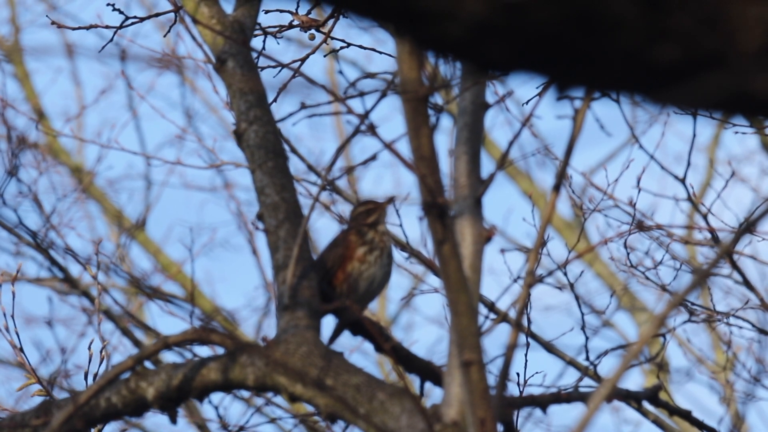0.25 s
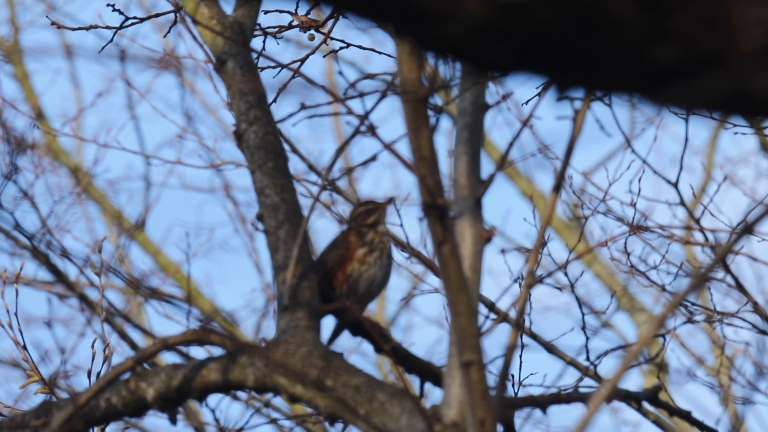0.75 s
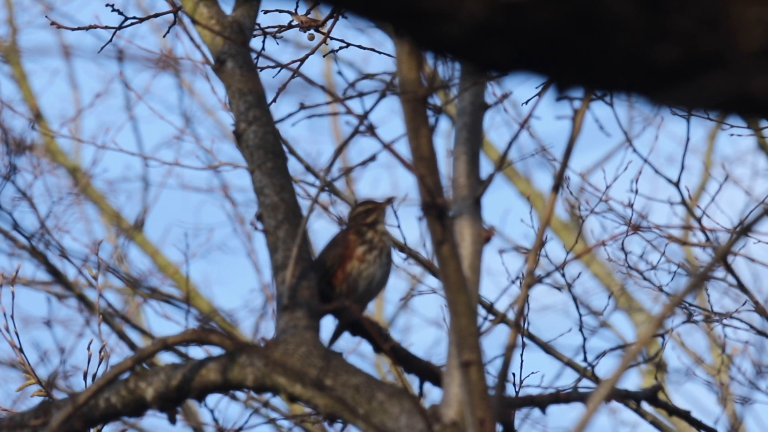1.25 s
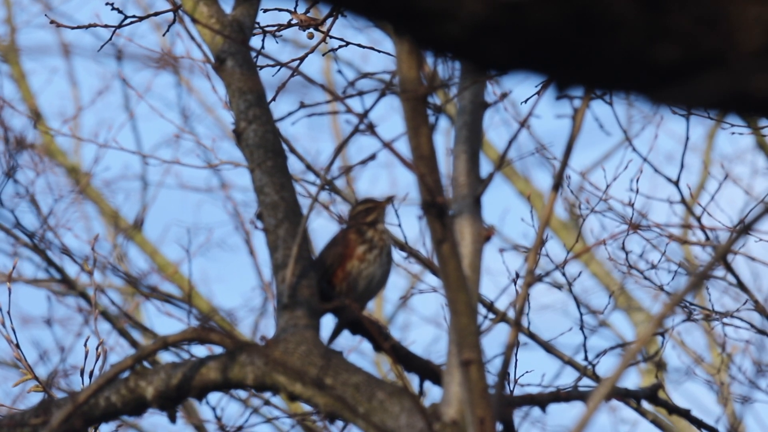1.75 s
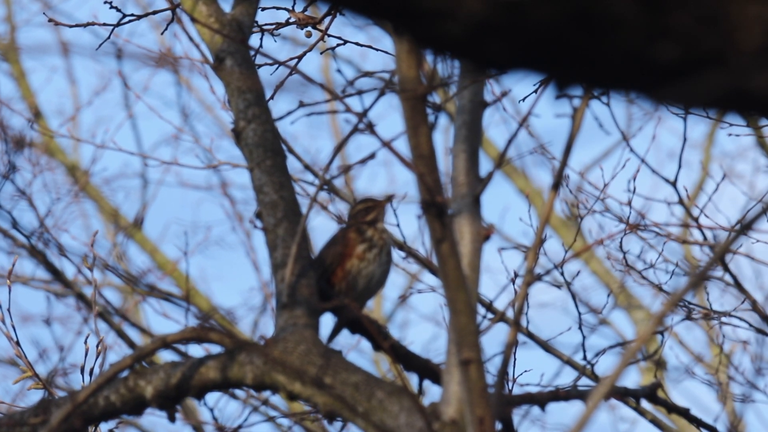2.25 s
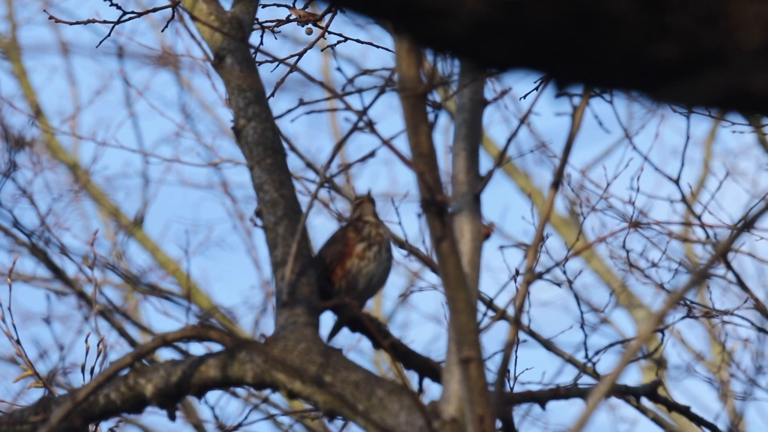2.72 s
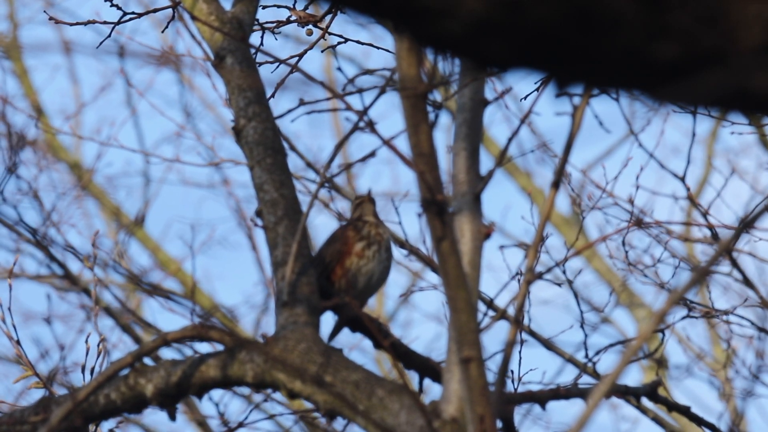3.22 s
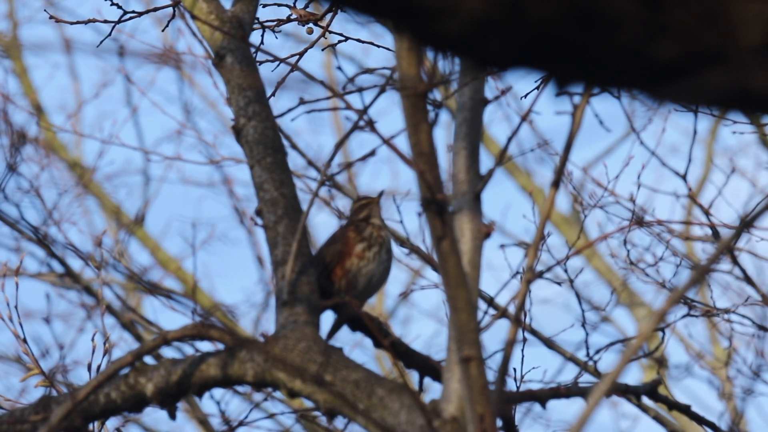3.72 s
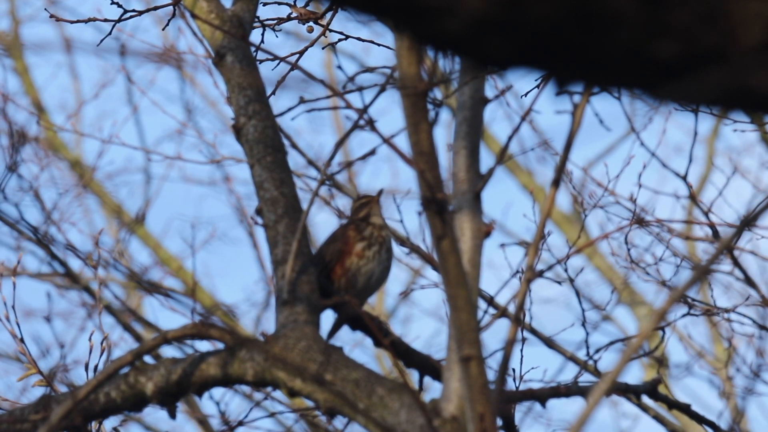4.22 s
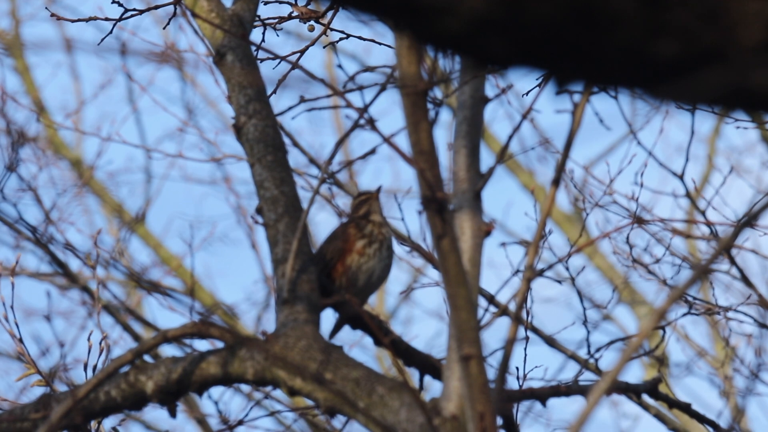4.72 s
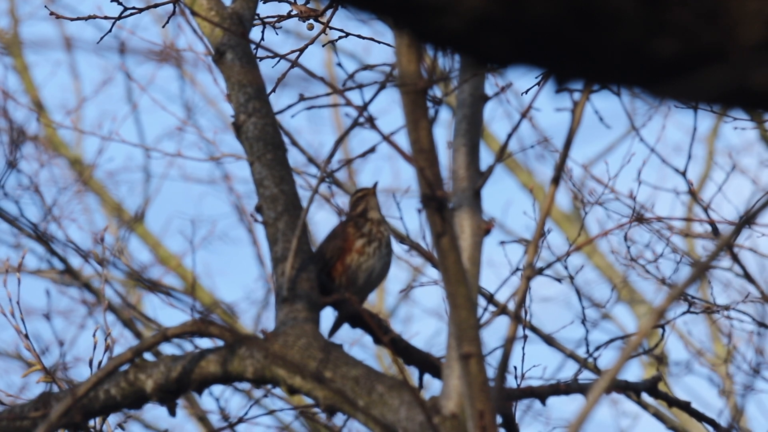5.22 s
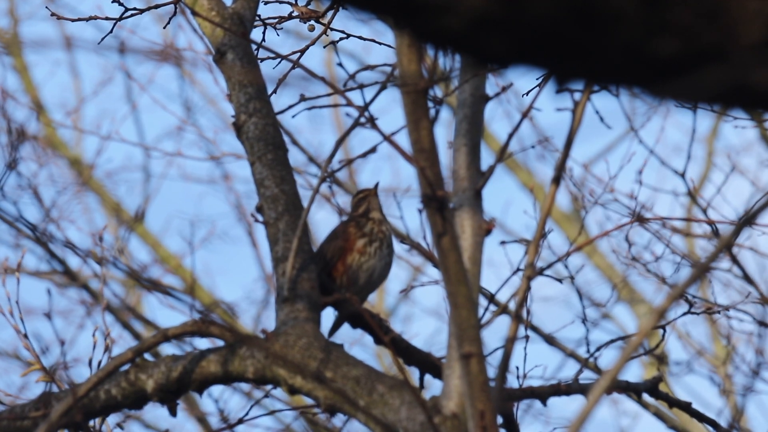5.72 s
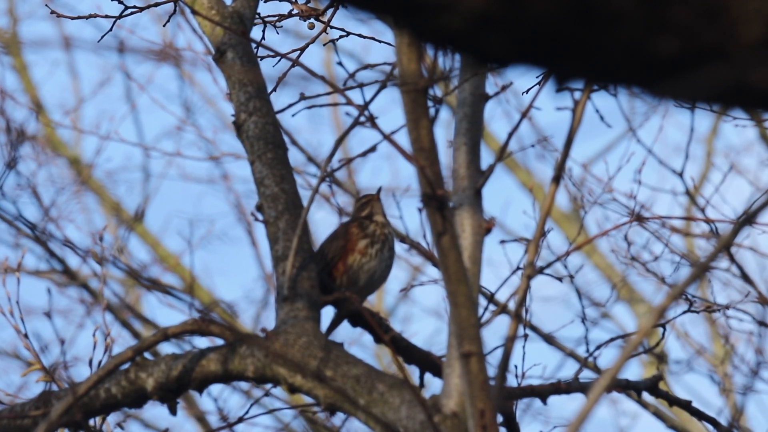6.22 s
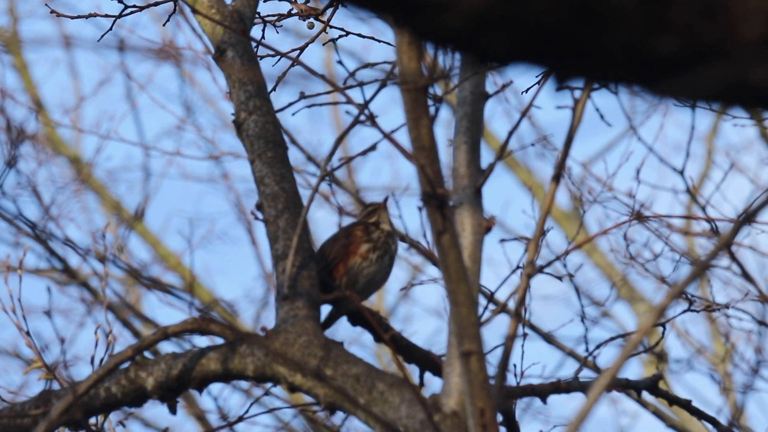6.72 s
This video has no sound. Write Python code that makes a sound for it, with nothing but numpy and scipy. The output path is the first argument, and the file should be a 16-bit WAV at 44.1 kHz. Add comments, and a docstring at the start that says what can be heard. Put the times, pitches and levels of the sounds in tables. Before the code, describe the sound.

Small thrushes twitter and whistle in park trees, one warbling louder nearby, over distant traffic and a brief rumble of wind on the microphone.

```python
"""A park, under bare trees. Small thrushes twitter all around in gliding whistles; the nearest sings a
loud warbled phrase, and trunks and branches scatter the song. Twigs rustle and tick, far traffic hums
underneath. For two seconds the sound turns wide and gusts of wind rumble on the microphone;
before and after, it is the same in both ears."""
import sys
import numpy as np
from scipy import signal
from scipy.io import wavfile
from scipy.ndimage import uniform_filter1d

SR = 44100
rng = np.random.default_rng(int(sys.argv[2]) if len(sys.argv) > 2 else 0)


def materialize(psi):
    """Save the field psi as 16-bit PCM at rate SR to the path in sys.argv[1].

    A 1-D psi becomes a single channel; in a 2-D psi each row is a channel.
    """
    bounded = np.clip(np.atleast_2d(psi).T, -1, 1)
    quanta = np.round(bounded * 32767).astype(np.int16)
    wavfile.write(sys.argv[1], SR, quanta)


N = 306936
TIME_S = np.arange(N) / SR


# Three warbles from the nearest bird, then a fainter, higher one; one curve each.
# time_s, swings_per_s, dip_hz, top_hz, level_db
WARBLE_CURVES = [
    [(1.487, 69, 2380, 3050, -33), (1.52, 30, 2400, 3340, -32.5), (1.565, 44, 2390, 3540, -34),
     (1.59, 98, 2900, 3300, -34)],
    [(1.74, 44, 2800, 3320, -22.5), (1.787, 48, 2465, 3394, -27), (1.814, 114, 2820, 3636, -23.5),
     (1.823, 106, 3280, 3940, -31.5), (1.843, 120, 3600, 4110, -21), (1.866, 117, 3260, 3845, -24.5),
     (1.882, 97, 3480, 3940, -27)],
    [(1.963, 110, 3570, 4070, -30), (1.984, 102, 3740, 3940, -34), (2.0, 66, 3370, 4150, -35),
     (2.05, 42, 3430, 4580, -29.5), (2.066, 92, 3570, 4360, -34), (2.087, 70, 3650, 4630, -29),
     (2.098, 79, 4500, 4870, -40)],
    [(2.408, 29, 5000, 6400, -47), (2.45, 43, 4760, 5830, -41.5), (2.5, 48, 4900, 5850, -46)],
]

def warble(curve):
    """The pitch swings from dip to top and falls back faster; tops are louder, no two reach alike."""
    times, *controls = np.transpose(curve)
    t = np.arange(times[0], times[-1], 1 / SR)
    swings_per_s, dip_hz, top_hz, db = (np.interp(t, times, c) for c in controls)
    cycle = np.cumsum(swings_per_s) / SR % 1
    lift = .5 - .5 * np.cos(2 * np.pi * cycle ** 1.2)
    reach = 1 + .17 * unit_rms(uniform_filter1d(rng.standard_normal(len(t)), size=500))
    hz = dip_hz + (top_hz - dip_hz) * (.5 + reach * (lift - .5))
    level = gain(db + 6.5 * (lift - 1.5)) * signal.windows.tukey(len(t), .07)
    return whistle(hz, level, rough=.13, overtone_db=-22)


# Single notes from the trees around the microphone.
# start_s, length_s, first_hz, middle_hz, last_hz, level_db
THRUSH_NOTES = [(0.13, 0.1, 4110, 5370, 4650, -54), (0.17, 0.046, 1960, 1990, 2040, -49.5),
                (0.263, 0.027, 5700, 5550, 5230, -52), (0.269, 0.14, 3000, 2640, 2330, -52.5),
                (0.394, 0.065, 4080, 4245, 4260, -45.5), (0.435, 0.19, 4250, 4240, 4200, -58),
                (0.881, 0.077, 7540, 7120, 6580, -50.5), (0.909, 0.21, 7080, 7020, 6500, -53),
                (1.086, 0.042, 2180, 2200, 1960, -44.5), (1.078, 0.054, 3410, 3480, 3550, -48),
                (1.157, 0.038, 2410, 2355, 2560, -45), (1.186, 0.023, 2500, 3460, 2900, -44.5),
                (1.211, 0.036, 3120, 3280, 3140, -47.5), (1.215, 0.058, 6160, 6280, 6300, -52.5),
                (1.258, 0.048, 3110, 3105, 3420, -39), (1.384, 0.052, 7300, 7510, 7300, -48),
                (1.385, 0.11, 3160, 2540, 2220, -40), (1.424, 0.1, 7160, 7010, 7330, -51.5),
                (1.569, 0.16, 7540, 7040, 6430, -51.5), (1.587, 0.054, 2960, 3175, 3570, -30),
                (1.603, 0.059, 6190, 6800, 7040, -53), (1.69, 0.048, 2930, 3350, 3520, -31),
                (1.75, 0.065, 4410, 4395, 4380, -39.5), (1.915, 0.045, 2500, 2620, 2950, -49),
                (2.084, 0.063, 4850, 5540, 5460, -40), (2.097, 0.049, 4700, 5050, 4930, -40),
                (2.223, 0.021, 7160, 5170, 4200, -44), (2.226, 0.05, 2980, 2900, 3020, -46),
                (2.232, 0.065, 2464, 2235, 2450, -47), (2.31, 0.058, 2400, 2550, 2950, -45),
                (2.406, 0.023, 5500, 7500, 7900, -49), (2.408, 0.048, 4080, 4020, 4460, -50),
                (2.424, 0.024, 6950, 6970, 7000, -42.5), (2.439, 0.029, 7470, 7560, 8330, -45),
                (2.465, 0.04, 8200, 8200, 8200, -47), (2.52, 0.048, 2300, 2910, 3180, -51),
                (2.545, 0.029, 3950, 4200, 4230, -47), (2.597, 0.019, 2300, 2890, 2300, -45),
                (2.618, 0.025, 3500, 2820, 2200, -42), (2.688, 0.035, 2450, 2380, 2270, -49),
                (2.657, 0.03, 3830, 4060, 4030, -45.5), (2.712, 0.031, 3500, 2730, 2100, -47),
                (2.725, 0.016, 5800, 4580, 3600, -46), (2.731, 0.036, 3540, 3620, 3830, -46),
                (2.785, 0.019, 3850, 4000, 4000, -44), (2.803, 0.019, 5900, 3980, 3500, -40),
                (2.83, 0.055, 6800, 5770, 5560, -53), (2.843, 0.045, 7220, 7200, 7000, -50),
                (2.853, 0.03, 3290, 3400, 3480, -48), (3.093, 0.083, 3330, 3444, 3540, -42),
                (3.109, 0.12, 6510, 6030, 5600, -48), (3.06, 0.28, 7300, 7550, 7500, -56),
                (3.19, 0.022, 4100, 3150, 2760, -39), (3.28, 0.053, 3140, 3110, 3980, -45),
                (3.316, 0.07, 3050, 3040, 2760, -40), (3.474, 0.034, 1220, 2290, 2970, -44),
                (3.559, 0.038, 5280, 6200, 6460, -52), (3.584, 0.085, 6770, 6580, 6720, -48),
                (3.722, 0.15, 3980, 4036, 4080, -49), (3.833, 0.073, 2660, 2225, 2230, -45.5),
                (3.9, 0.14, 7440, 7200, 7000, -58), (4.133, 0.046, 2000, 2070, 2070, -45.5),
                (4.181, 0.25, 5450, 5400, 4800, -58), (4.191, 0.13, 3490, 3470, 3720, -52),
                (4.249, 0.15, 7140, 6520, 6630, -48.5), (4.259, 0.02, 7720, 7760, 7590, -48),
                (4.316, 0.068, 3070, 2970, 2740, -47.5), (4.575, 0.13, 7080, 7280, 7170, -51.5),
                (4.685, 0.064, 2680, 3020, 2730, -46), (4.734, 0.054, 4410, 4460, 4400, -44),
                (4.775, 0.14, 4470, 4410, 4480, -57), (4.788, 0.02, 7000, 8450, 7400, -54),
                (4.81, 0.035, 2800, 2260, 1770, -55), (4.938, 0.018, 7300, 8270, 8400, -51),
                (5.03, 0.022, 6500, 8260, 7400, -51), (5.05, 0.033, 3300, 3200, 2320, -49),
                (5.155, 0.13, 8100, 8300, 7200, -67), (5.158, 0.06, 2200, 2340, 2620, -53.5),
                (5.13, 0.14, 5300, 5780, 5800, -57.5), (5.14, 0.125, 3950, 4200, 4000, -56),
                (5.275, 0.032, 4500, 7800, 4900, -59), (5.287, 0.1, 2950, 2970, 2990, -50),
                (5.383, 0.028, 6540, 3900, 3100, -55), (5.403, 0.032, 3320, 2920, 3040, -44),
                (5.425, 0.12, 3620, 3450, 3170, -50), (5.541, 0.034, 2170, 3200, 4500, -47),
                (5.542, 0.018, 3300, 5200, 7200, -54), (5.565, 0.18, 7250, 6860, 6720, -55.5),
                (5.642, 0.19, 7300, 8640, 8700, -63), (5.629, 0.083, 3700, 3800, 4200, -51.5),
                (5.704, 0.14, 4290, 4350, 4260, -52), (5.814, 0.084, 7950, 7340, 7400, -53.5),
                (5.82, 0.052, 2850, 3180, 3680, -49), (5.828, 0.027, 3040, 2470, 2350, -45),
                (5.877, 0.165, 3660, 3800, 3440, -53.5), (5.963, 0.092, 4300, 4150, 4030, -53.5),
                (6.109, 0.0099, 2400, 3670, 2500, -37), (6.075, 0.051, 6700, 7040, 8000, -53),
                (6.12, 0.12, 7800, 7050, 7000, -54), (6.13, 0.042, 2100, 2700, 3200, -47),
                (6.182, 0.032, 2700, 2100, 1900, -50), (6.222, 0.08, 2550, 2520, 2490, -54),
                (6.23, 0.053, 3650, 3850, 4080, -54), (6.485, 0.028, 4900, 5840, 4600, -56),
                (6.193, 0.11, 4650, 6200, 6250, -55), (6.34, 0.15, 6500, 7050, 7100, -55.5),
                (6.575, 0.14, 7630, 7730, 7750, -59), (6.7, 0.081, 3800, 4300, 5100, -57),
                (6.786, 0.16, 4920, 4440, 4630, -58.5), (6.81, 0.074, 6910, 6780, 7100, -51.5),
                (6.873, 0.056, 6840, 7120, 7800, -54), (6.912, 0.04, 3300, 2780, 3000, -49)]

def thrushes():
    """The notes and warbles that stand out; fainter, farther notes are more blurred."""
    song = np.zeros(N)
    for start_s, *glide, db in THRUSH_NOTES:
        add(song, start_s, note(*glide, db, rough=np.interp(db, [-52, -34], [.24, .1])))
    for curve in WARBLE_CURVES:
        add(song, curve[0][0], warble(curve))
    return song


def note(length_s, first_hz, middle_hz, last_hz, db, rough):
    """A whistle bending along a parabola through three pitches; each end fades over 11 ms."""
    u = np.linspace(-1, 1, round(length_s * SR))
    hz = middle_hz + (last_hz - first_hz) / 2 * u + ((first_hz + last_hz) / 2 - middle_hz) * u ** 2
    fade = np.sin(np.pi / 2 * np.clip((1 - abs(u)) * length_s / .022, 0, 1))
    return whistle(hz, gain(db) * fade, rough, overtone_db=-29)


def whistle(hz, level, rough, overtone_db):
    """A bird's voice: a sine and a faint octave, trembling in pitch and strength, coming in lumps."""
    lumps = uniform_filter1d(rng.standard_normal(len(hz)), size=400) * np.sqrt(400)
    wobble, flutter = uniform_filter1d(rng.standard_normal((len(hz), 2)), 90, axis=0).T * np.sqrt(90)
    phase = 2 * np.pi * np.cumsum(hz * (1 + .037 * rough * wobble)) / SR
    strength = level * gain(7.4 * rough * lumps) * (1 + rough * flutter)
    return np.sqrt(2) * strength * (np.sin(phase) + gain(overtone_db) * np.sin(2 * phase))


def tree_echoes(song, t60_s, wet_db):
    """Trunks and branches return sparse, dying echoes; farther trees add a faint long tail."""
    tail_db, tail_t60_s = -18, 1
    t = np.arange(SR // 2) / SR
    decay = gain(-60 * t / t60_s) + gain(tail_db - 60 * t / tail_t60_s)
    echoes = rng.standard_normal(len(t)) * (rng.random(len(t)) < .05) * decay * (t > .004)
    echoes /= np.linalg.norm(echoes)
    echoes[round(.058 * SR)] += .25  # one distinct echo
    return song + gain(wet_db) * signal.fftconvolve(song, echoes)[:N]


# Gusts right on the microphone: time_s, level_db
GUST_LEVELS = [(.85, -38.5), (1.0, -37.5), (1.2, -36.5), (1.5, -33), (1.95, -35.5), (2.3, -34), (2.89, -38)]
# Their rumble: frequency_hz, density_db
WIND_SPECTRUM = [(15, -45), (28, -22), (42, -3), (62, 4), (100, -7), (180, -10), (400, -21), (650, -33)]
# Single buffets: centre_s, peak_db, pitch_hz
WIND_BUFFETS = [(1.074, -25, 66), (1.445, -35, 92), (1.534, -16, 70.5), (1.589, -17, 95), (1.69, -25, 55),
                (1.8, -18, 67.7), (1.879, -23, 59.6), (1.92, -19.5, 61.4), (2.15, -20, 57),
                (2.171, -20, 123), (2.4, -22.5, 55), (2.547, -26, 55), (2.63, -27, 52),
                (2.861, -24.5, 66.5)]

def wind():
    """Rumble and buffets of two or three cycles, partly unrelated between the ears: mid and side."""
    level = gain(along(GUST_LEVELS, 1)) * wide_stretch()
    mid, side = (level * noise(WIND_SPECTRUM, patchy_db=1.5, size=4096) for _ in range(2))
    for centre_s, db, hz in WIND_BUFFETS:
        phase, lean = rng.random(2)
        cycles = hz * (TIME_S - centre_s)
        buffet = gain(db) * np.cos(2 * np.pi * (cycles + phase)) * np.exp(-(1.24 * cycles) ** 2)
        mid += buffet
        side += (lean - .5) * buffet
    return mid, gain(-7) * side


# Twigs ticking: centre_s, knock_db, pitch_hz, snap_db
TWIG_TICKS = [(1.668, -19.5, 1350, -38), (3.222, -28, 1220, -29.5), (3.243, -27, 1550, -29.5)]

def twig_ticks():
    """A cycle or two of knock with a sharp snap just in front."""
    out, t = np.zeros(N), np.arange(-100, 200) / SR
    for centre_s, knock_db, hz, snap_db in TWIG_TICKS:
        knock = gain(knock_db) * np.cos(2 * np.pi * hz * t) * np.exp(-(2.25 * hz * t) ** 2)
        hiss = uniform_filter1d(rng.standard_normal(len(t)), size=3)
        snap = gain(snap_db) * hiss * np.exp(-abs(t + .00033) / .0011)
        add(out, centre_s + t[0], knock + snap)
    return out


# The park's background, slowly drifting: time_s, traffic_db, low_chorus_db, high_chorus_db, rustle_db
PARK_LEVELS = [(0.0, -44.5, -50.5, -51.5, -53), (0.75, -43, -52.5, -64.5, -53.5),
               (1.24, -43.5, -49.5, -56, -53.5), (1.65, -42.5, -48.5, -56.5, -56),
               (2.32, -44, -48.5, -53.5, -52), (2.71, -41.5, -48.5, -49.5, -59), (2.85, -44, -49, -55, -55),
               (4.65, -44.5, -52, -54, -56), (5.82, -44, -50, -57, -55.5), (6.96, -44, -56, -63, -53)]
# The farthest song, blurred into two bands: frequency_hz, density_db
LOW_SONG_SPECTRUM = [(1300, 9.5), (1800, 12), (2500, 11), (3500, -7), (4800, -8), (6000, -36)]
HIGH_SONG_SPECTRUM = [(4000, -46), (5200, 0), (6500, 4), (7500, 5), (8500, -19), (10000, -36)]

def far_chorus():
    """Distant twitter, thin whistles and steep chips, low and high, over a blur of farther song."""
    low = gain(-3.5) * twitter(2000, 3600, spread_s=.05, bend=.358, count=700)
    low += gain(-12.5) * twitter(2200, 5200, spread_s=.09, bend=.35, count=110)
    low += gain(-6) * twitter(2197, 3810, spread_s=.0149, bend=.907, count=250)
    high = gain(-3.5) * twitter(6400, 7900, spread_s=.06, bend=.1654, count=420)
    high += gain(-12) * twitter(5000, 8400, spread_s=.13, bend=.3, count=110)
    high += gain(-5) * twitter(3600, 6500, spread_s=.02, bend=.9, count=400)
    low = tree_echoes(low, t60_s=.5, wet_db=-1) + gain(-9) * noise(LOW_SONG_SPECTRUM, patchy_db=2.5)
    high = tree_echoes(high, t60_s=.4, wet_db=-3) + gain(-9) * noise(HIGH_SONG_SPECTRUM, patchy_db=2.5)
    return gain(along(PARK_LEVELS, 2)) * low + gain(along(PARK_LEVELS, 3)) * high


def twitter(low_hz, high_hz, spread_s, bend, count):
    """Many far birds: short random glides, some louder than others."""
    out = np.zeros(N)
    for when, length, pitch, first, last, loud in rng.random((count, 6)):
        hz = low_hz * (high_hz / low_hz) ** pitch
        first_hz, last_hz = hz * (1 + bend * (first - .5)), hz * (1 + bend * (last - .5))
        length_s = .012 + spread_s * length ** 2
        add(out, when * N / SR, note(length_s, first_hz, hz, last_hz, db=7.5 * loud, rough=.23))
    return unit_rms(out)


# Twigs rustling, steadily and in puffs: frequency_hz, density_db
RUSTLE_SPECTRUM = [(1500, -21), (3000, 12.5), (8000, 4.5), (10000, -1.5), (13000, -5), (16000, -8.5)]
PUFF_SPECTRUM = [(1500, 3), (3500, -3.5), (7500, 9), (10000, -2.5), (13000, -7), (16000, -16)]
# The puffs: centre_s, length_s, level_db
RUSTLE_PUFFS = [(.27, 0.04, -50), (.44, 0.16, -53.5), (.58, 0.086, -52.5), (.77, 0.11, -56),
                (.667, 0.047, -41.5), (2.75, 0.28, -53), (3.49, .04, -51), (6.17, 0.055, -52)]

def twig_rustle():
    """Bright steady hiss with short crackly puffs riding on it."""
    click_db = 4.5 * np.minimum(rng.exponential(1, N), 4)
    clicks = gain(click_db) * (rng.random(N) < 400 / SR)  # about 400 a second
    crackle = 1 + 3 * uniform_filter1d(clicks, size=30)
    hiss = gain(along(PARK_LEVELS, 4)) * noise(RUSTLE_SPECTRUM, patchy_db=2.5, size=256)
    puffs = unit_rms(noise(PUFF_SPECTRUM, patchy_db=2.5, size=256) * crackle)
    return hiss + swells(RUSTLE_PUFFS) * puffs


# Traffic, far off: frequency_hz, density_db
TRAFFIC_SPECTRUM = [(12, -40), (20, -27), (63, 1), (113, 1), (167, -2), (465, -4.5), (534, -5.5),
                    (823, -3.5), (1320, -11), (2200, -17), (2860, -54)]

def far_traffic():
    """A low, even wash of noise in the mid, a weaker and patchier one in the side."""
    level = gain(along(PARK_LEVELS, 1) + .5 * wide_stretch())
    mid = level * noise(TRAFFIC_SPECTRUM, patchy_db=1.17, size=2048)
    side = gain(-6.5) * level * noise(TRAFFIC_SPECTRUM, patchy_db=5.5, size=2048)
    return mid, side


# A hoarse hum in the distance: centre_s, length_s, level_db
HUM_SWELLS = [(.72, 0.21, -48.5), (4.2, 0.41, -55), (6.8, 0.73, -50.5)]
# Its colour: frequency_hz, density_db
HUM_SPECTRUM = [(950, -19), (1250, -6.5), (1500, -1), (1850, -11)]

def far_hum():
    """A narrow band of noise that swells three times."""
    return swells(HUM_SWELLS) * noise(HUM_SPECTRUM, patchy_db=.7)


# Very faint hiss near 10 kHz: frequency_hz, density_db
SIDE_HISS_SPECTRUM = [(9200, -27), (10000, 4), (11200, -15), (11700, -30)]

def side_hiss():
    """Treble noise that differs between the ears, heard only during the wide two seconds."""
    return gain(-69.5) * noise(SIDE_HISS_SPECTRUM, patchy_db=3.5)


def noise(spectrum, patchy_db, size=512):
    """Noise of a given colour at rms 1, its level drifting in patches over time and frequency."""
    hz, frames = np.fft.rfftfreq(size, 1 / SR), 4 * N // size + 5
    real, imag, patches = rng.standard_normal((frames, len(hz), 3)).T
    patches = unit_rms(uniform_filter1d(uniform_filter1d(patches, size=5, axis=0), size=14, axis=1))
    knots_hz, db = np.transpose(spectrum)
    colour_db = np.interp(np.log(hz + 1), np.log(knots_hz + 1), db, left=-90, right=-90)[:, None]
    spectra = (real + 1j * imag) * gain(colour_db + patchy_db * patches)
    return unit_rms(signal.istft(spectra, nperseg=size, noverlap=3 * size // 4)[1][:N])


def wide_stretch(start_s=.855, end_s=2.895):
    """One during the wide, windy stretch, zero outside, with quick ramps."""
    return uniform_filter1d(1. * (TIME_S > start_s) * (TIME_S < end_s), size=600)


def swells(rows):
    """Bell-shaped rises of level."""
    return sum(gain(db) * np.exp(-(2 * (TIME_S - s) / length_s) ** 2) for s, length_s, db in rows)


def along(rows, column):
    """One column of a curve at every sample."""
    rows = np.array(rows)
    return np.interp(TIME_S, rows[:, 0], rows[:, column])


def add(mix, start_s, sound):
    """Mixes a sound in at its start time."""
    part = mix[round(start_s * SR):][:len(sound)]
    part += sound[:len(part)]


def gain(db):
    """Decibels to amplitude."""
    return 10 ** (np.asarray(db) / 20)


def unit_rms(x):
    """Scales to rms 1."""
    return x / np.sqrt(np.mean(x ** 2) + 1e-20)


def scene():
    """The park at the microphone: mid (common) and side (difference), turned into left and right."""
    birds = tree_echoes(thrushes(), t60_s=.064, wet_db=-7) + far_chorus()
    wind_mid, wind_side = wind()
    traffic_mid, traffic_side = far_traffic()
    mid = birds + wind_mid + twig_ticks() + twig_rustle() + traffic_mid + far_hum()
    # low song reaches the left of the microphone first: a small delay is a slope in the side signal
    low_song_band = signal.butter(2, [2200, 4600], "band", fs=SR, output="sos")
    left_lead = .67 * signal.sosfiltfilt(low_song_band, np.gradient(birds))
    side = left_lead + wind_side + traffic_side + side_hiss()
    return np.array([mid + side, mid - side])


def record(dry):
    """Both channels are alike outside the wide stretch; the treble ends steeply at 15.7 kHz."""
    mid, side = dry.mean(0), wide_stretch() * (dry[0] - dry[1]) / 2
    lowpass = signal.firwin(511, 15700, window=("kaiser", 9), fs=SR)
    return signal.oaconvolve(np.array([mid + side, mid - side]), lowpass[None], "same")


dry = scene()
out = record(dry)
materialize(out)
```